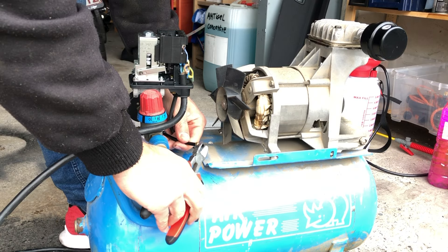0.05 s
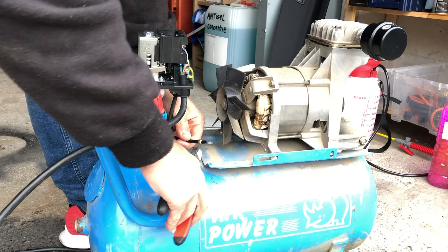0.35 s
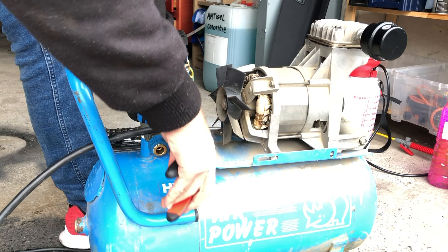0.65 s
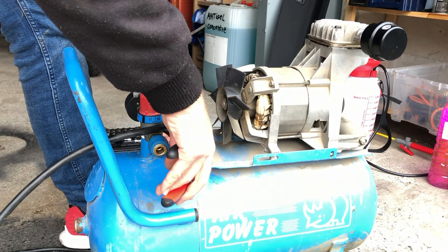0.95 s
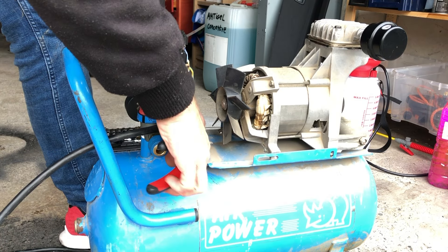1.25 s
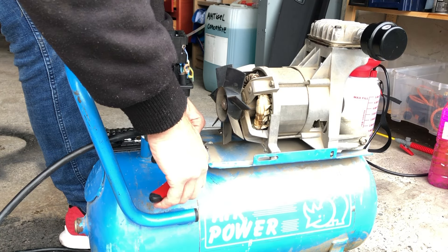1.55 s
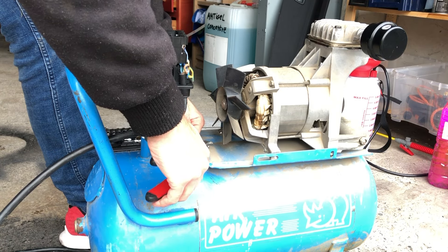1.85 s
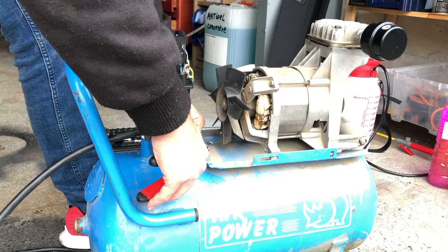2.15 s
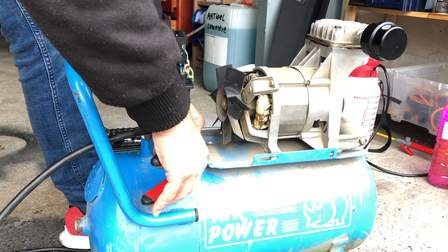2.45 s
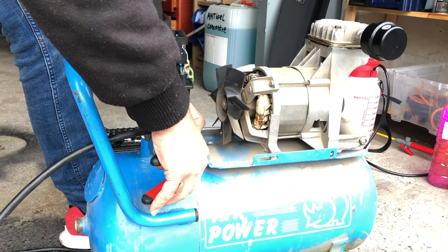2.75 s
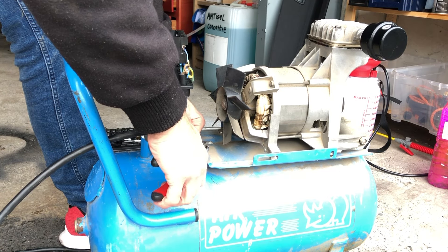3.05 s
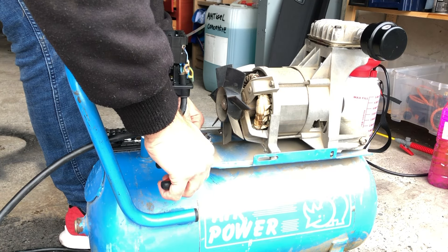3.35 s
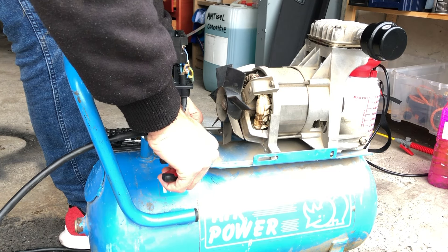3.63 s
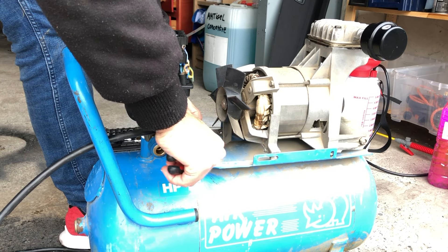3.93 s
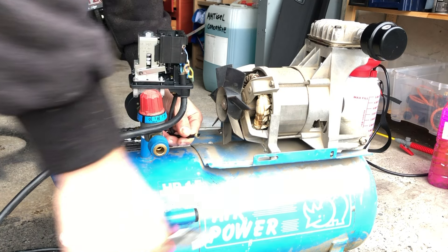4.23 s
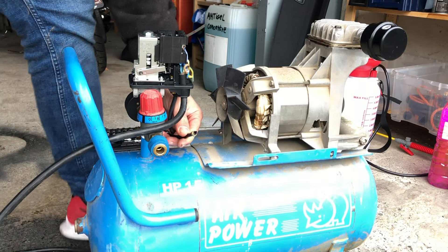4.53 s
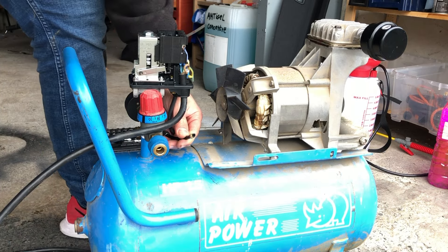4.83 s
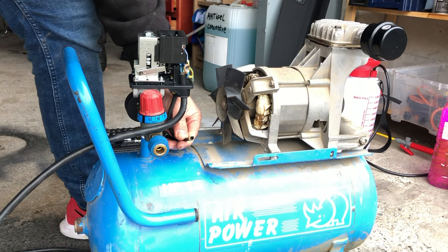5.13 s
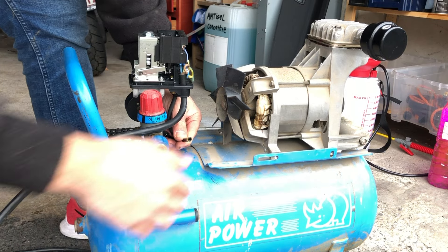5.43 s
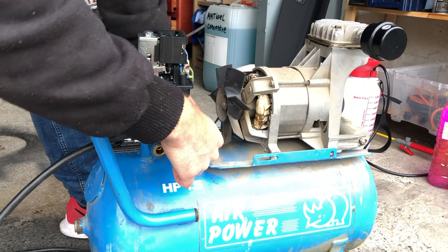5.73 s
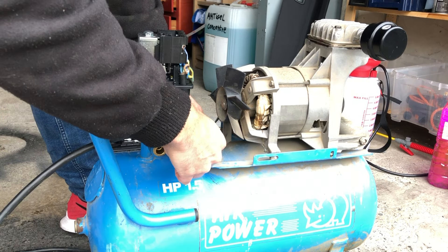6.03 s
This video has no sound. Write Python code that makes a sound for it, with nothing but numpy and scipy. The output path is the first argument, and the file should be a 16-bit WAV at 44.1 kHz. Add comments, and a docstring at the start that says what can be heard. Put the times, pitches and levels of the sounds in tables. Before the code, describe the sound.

Compressed air hisses steadily from a leaking fitting on a small workshop compressor, its tone shifting as a hand works around it. About halfway through, the leak is pinched off for half a second. It breaks out again with a pop that rings the steel tank, hisses a little louder and spits a few times. Light knocks and faint room rumble lie underneath, all heard through one microphone.

```python
"""A steady hiss comes first: compressed air leaking from a fitting on a small workshop compressor.
It rings in the short pipe behind the gap and takes its colour from the hand working around it.
The leak is pinched off for half a second, breaks out again with a pop that rings the tank, and spits
a few times. Light knocks, room rumble and a far, low hum lie underneath.
One microphone, the same on both channels."""
import sys
import numpy as np
from scipy import signal
from scipy.fft import rfft, irfft
from scipy.io import wavfile
from scipy.ndimage import map_coordinates

SR = 44100
rng = np.random.default_rng(int(sys.argv[2]) if len(sys.argv) > 2 else 0)


def wrap_up_sound(samples):
    """Save the sound to the file named by the first command line argument, as 16-bit audio."""
    columns = np.atleast_2d(samples).T
    # keep every value between -1 and 1, then stretch to whole-number steps
    tamed = np.clip(columns, -1, 1)
    steps = np.round(tamed * 32767).astype(np.int16)
    wavfile.write(sys.argv[1], SR, steps)


N = 277036
TIME = np.arange(N) / SR
HZ = np.maximum(np.fft.rfftfreq(N, 1 / SR), 1)

# The jet's strength before and after the pinch. Each row: time in seconds, level in dB.
LEAK_BEFORE = [(0.03, -33.5), (0.26, -34), (0.78, -38), (0.87, -34.5), (1.34, -32), (1.74, -33),
               (1.9, -31.5), (2.45, -33), (3.28, -33), (3.34, -30), (3.39, -38), (3.42, -49)]
LEAK_AFTER = [(3.94, -25), (4.01, -29), (4.06, -33), (4.27, -29), (5.14, -28.5), (5.45, -29.5), (5.55, -32),
              (5.66, -31), (5.76, -26.5), (6.22, -25), (6.27, -29.5)]
# Two spells of hiss, running past both ends of the scene. Each row: strength curve, opening and shutting
# in seconds, share of the swing that the low body follows, delay of the tank's reflection in seconds.
HISS_SPELLS = [(LEAK_BEFORE, -1, 3.42, 0.084, .00133), (LEAK_AFTER, 3.921, 7, 0.78, .0014)]
# Turbulence of the free jet. Each row: frequency in Hz, relative level in dB.
JET_SPECTRUM = [(60, -21.5), (200, -15), (420, -10), (750, -2), (1100, 1), (2200, 1), (4000, 3),
                (8000, 1.5), (12000, -3), (15500, -5)]
# Resonances and shadows of hand and gap, a table a grip. Each row: centre in Hz, width in Hz, gain in dB.
REACHING = [(1310, 160, -9), (1630, 300, 2.5), (2030, 430, -4), (2950, 110, 5), (3510, 380, 6),
            (4340, 300, 9.5), (4970, 2700, -5.5), (6340, 300, 6.5), (7200, 260, 6), (8100, 220, 2.5),
            (8500, 240, -7), (10200, 370, -2), (11680, 240, 4), (12900, 340, -4), (14200, 280, 4)]
TURNING = [(1330, 110, -10), (1780, 250, 5), (2310, 710, -5), (3940, 380, -8), (4510, 300, 6.5),
           (5430, 480, 8.5), (6000, 1430, -8), (8200, 190, 2), (9260, 260, 4), (9750, 200, 3),
           (12660, 330, -9), (15250, 260, -11)]
CUPPED = [(788, 57, -7.5), (1290, 190, -9.5), (1810, 340, 0.5), (2230, 490, -3), (2715, 92, -15),
          (3920, 670, -7), (4330, 460, 6.5), (4800, 220, -3), (6180, 780, -6.5), (7370, 120, -6),
          (8560, 200, -3), (9090, 380, 5.5), (12250, 620, -6), (13700, 400, -1), (15200, 1800, -4.5)]
PINCHED = [(820, 200, -6.4), (1440, 6200, -10), (8660, 540, -4.8), (13800, 240, -9), (13500, 770, 8),
           (14510, 190, 3)]
LOOSE = [(596, 230, 0.5), (1920, 150, -9.5), (2970, 220, 7.5), (4120, 890, 6), (8900, 190, -5.1),
         (10000, 210, 9), (11600, 310, -6), (12040, 360, 11.5), (14600, 270, 14)]
OPEN = [(680, 230, -3), (1650, 1170, -5), (1850, 160, -6.5), (2840, 290, 4), (4630, 290, -4.5),
        (5240, 210, -11), (5900, 260, -4.5), (6530, 460, 6), (7910, 440, -13.5), (8180, 200, 8),
        (8500, 220, -4), (9080, 250, 3), (9500, 240, -2), (11040, 700, -3.5), (14500, 280, 2.5)]
COVERED = [(1300, 990, -6.5), (2200, 150, 3.5), (2980, 190, 2.5), (3800, 220, -7), (7080, 1370, 5.5),
           (8300, 220, 6), (9200, 300, -4.5), (9900, 220, 6), (13400, 800, 1)]
# Grips by name. Each entry: resonances, share of the wave that the pipe's end sends back.
GRIPS = {"reaching": (REACHING, 0.34), "turning": (TURNING, 0.35), "cupped": (CUPPED, 0.48),
         "pinched": (PINCHED, 0.11), "loose": (LOOSE, 0.28), "open": (OPEN, 0.28),
         "covered": (COVERED, 0.22)}
# The hand glides into a new grip. Each row: start in seconds, glide in seconds, grip.
GRIP_CHANGES = [(.42, 0.37, "turning"), (1.22, .11, "cupped"), (3.1, 0.13, "reaching"),
                (3.24, 0.075, "pinched"), (3.93, 0.04, "covered"), (3.98, 0.048, "loose"),
                (4.16, 0.11, "open"), (5.47, .08, "loose"), (5.63, 0.17, "covered")]
FIRST_GRIP = "reaching"
# Hand or sleeve passes the jet. Each row: closest moment in seconds, half length in seconds,
# delay of the reflection when closest in seconds, share reflected.
ARM_PASSES = [(1.232, 0.5, 0.000202, 0.074), (4.15, 0.13, 0.000135, 0.14), (6.09, 0.5, 0.000423, 0.092),
              (6.07, .55, .00081, 0.14), (6.14, 0.35, 0.000107, 0.069)]
# Pops and spits at the gap. Each row: start in seconds, level in dB, pitch in Hz, overtone spacing in Hz,
# first overtone's loss in dB, swell in seconds, ratio of crack to tone.
GAP_POPS = [(3.9135, -12, 1945, 1890, 0.7, 0.0016, 0.53), (3.9185, -21.5, 875, 600, 10, 0.0013, .5),
            (4.012, -23.5, 3400, 1400, 2, 0.0031, 1.3), (4.933, -5.5, 1110, 1730, 6.5, .0016, .14),
            (4.931, -18.5, 2090, 1300, 5, .0012, .15), (4.96, -23, 1150, 900, 15, 0.0013, .12),
            (5.023, -21, 6160, 2300, 8, .002, .15), (5.0558, -13, 1200, 750, 1.5, 0.0012, 0.1),
            (5.0617, -12.5, 5900, 2400, 5, 0.0013, .11), (5.0703, -10.5, 1330, 750, 24, 0.00053, 0.13),
            (5.0924, -16.5, 1220, 750, 9, 0.0014, 0.31), (5.108, -15.5, 3530, 1050, -0.5, 0.00097, .25),
            (5.1103, -21, 4630, 1900, 10, 0.002, 1.5)]
# Blows on the steel tank. Each row: start in seconds, level in dB.
TANK_KNOCKS = [(.229, -42), (1.459, -40.5), (2.479, -36), (3.219, -50), (3.919, -28.5)]
# The tank's modes. Each row: frequency in Hz, relative level in dB, seconds to fall by 60 dB.
TANK_MODES = [(226, -19, 0.21), (415, -15, 0.13), (729, 1, 0.13), (1230, -13, .08), (2050, -2.5, 0.047),
              (3774, -5, .06), (6530, -1, .06)]
# Low, dull thuds. Each row: start in seconds, level in dB, pitch in Hz, swell in seconds.
LOW_THUDS = [(3.494, -48, 110, 0.009), (3.57, -51, 70, 0.0096), (3.916, -33, 225, 0.0057),
             (3.921, -44, 61, .012), (4.275, -38.5, 62, .01), (4.655, -38, 270, 0.0056),
             (4.933, -27, 540, .0031), (5.148, -45, 281, .009), (6.206, -37, 75, 0.012),
             (6.25, -40, 80, .01)]
# Ticks of the fitting while it is held shut. Each row: start in seconds, level in dB, pitch in Hz.
FITTING_TICKS = [(3.647, -43, 3860), (3.861, -54, 6000), (3.874, -48, 4500)]
# The sleeve brushes along. Each row: middle in seconds, half length in seconds, level in dB.
SLEEVE_STROKES = [(4.616, 0.12, -47.5), (5.08, 0.2, -51), (5.628, 0.15, -49.5)]
# Rubbing cloth. Each row: frequency in Hz, relative level in dB.
CLOTH_SPECTRUM = [(40, -18), (110, -8), (250, -3.5), (480, -0.5), (900, -3), (3000, -30)]
# The workshop's room tone. Each row: frequency in Hz, relative level in dB.
ROOM_SPECTRUM = [(25, -24), (40, -7), (60, -5.5), (100, -3), (160, -5.5), (220, -12), (330, -15),
                 (700, -16), (1800, -21.5), (3500, -25.5), (15000, -41.5)]
# A far, low hum. Each row: time in seconds, level in dB.
HUM_LEVELS = [(0.0, -72), (1.71, -58), (3.25, -67), (3.99, -56), (4.01, -61), (6.1, -65), (6.15, -61)]


def leak(flutter_db, tank_share, body_hz, body_db, surge_db, surge_s):
    """At the fitting: jet noise coloured by pipe and hand, rippled by a reflection off the tank."""
    hiss, out = np.zeros(N), np.zeros(N)
    for name, (resonances, reflection) in GRIPS.items():
        colour = from_db(spectrum_db(JET_SPECTRUM) + hand_db(resonances)) * pipe(reflection)
        hiss += np.sqrt(grip_share(name)) * noise(colour, above_hz=4000)
    hiss *= from_db(flutter_db * drift(rate_hz=36))
    # Long waves bend round the hand, so the body swells and fades less than the treble.
    body = irfft(rfft(hiss) / (1 + (HZ / body_hz) ** 4), N)
    for strength, opens, shuts, follows, echo_s in HISS_SPELLS:
        db = in_time(strength)
        blowing = (TIME > opens) & (TIME < shuts)
        fullness_db = body_db + np.minimum((1 - follows) * (np.median(db[blowing]) - db), 5.5)
        surge = surge_db * np.exp(-np.abs(TIME - opens) / surge_s)  # pent-up air escapes on opening
        jet = blowing * from_db(db + surge) * (hiss + (from_db(fullness_db) - 1) * body)
        out += jet + tank_share * delayed(jet, echo_s)
    return out


def pipe(reflection, spacing_hz=897, treble_loss_hz=60000):
    """Waves run up and down the pipe, losing treble on each round: evenly spaced resonances."""
    round_trip = reflection * np.exp(-HZ / treble_loss_hz - 2j * np.pi * HZ / spacing_hz)
    return 1 / np.abs(1 - round_trip)


def hand_db(resonances):
    """Humps and hollows that the hand puts on the hiss."""
    return sum(db * np.exp(-.5 * (2 * (HZ - hz) / width) ** 2) for hz, width, db in resonances)


def grip_share(name):
    """How far the hand is in one grip, 0 to 1: each new grip takes over from the one before."""
    held = np.full(N, float(name == FIRST_GRIP))
    for start, glide, grip in GRIP_CHANGES:
        held += np.clip((TIME - start) / glide, 0, 1) * ((grip == name) - held)
    return np.clip(held, 0, 1)


def passing_arm(hiss, detour_growth):
    """The arm throws hiss to the microphone over a detour that shrinks and grows: moving ripples."""
    out = hiss.copy()
    for closest, half_length, nearest_delay, share in ARM_PASSES:
        away = np.minimum(((TIME - closest) / half_length) ** 2, 2)
        delay = nearest_delay * (1 + detour_growth * away)
        reflections = delayed(hiss, delay) + .8 * delayed(hiss, 2.3 * delay)
        out += share * np.exp(-away ** 2) * reflections
    return out


def pops(sag_hz, crack_hz):
    """Air and droplets break through the gap in bursts of milliseconds, each with two overtones."""
    out = np.zeros(N)
    for start, db, pitch, spacing, loss_db, swell, crack in GAP_POPS:
        for k in range(3):
            hz = pitch + k * spacing
            partial_swell = swell * (pitch / hz) ** .35  # higher partials die sooner
            partial = burst(hz, partial_swell, crack, sag_hz, crack_hz)
            add(out, start, from_db(db - loss_db * k ** 2) * partial)
    return out


def burst(hz, swell_s, crack, sag_hz, crack_hz):
    """A heavily damped ring that swells and dies with a crack of noise; sag_hz makes its pitch sink."""
    age = TIME[:int(10 * swell_s * SR)] / swell_s
    pitch = hz + sag_hz * (np.exp(-age) - np.exp(-1))
    tone = np.sin(2 * np.pi * np.cumsum(pitch) / SR)
    band = signal.butter(1, [hz / 3, crack_hz], "band", fs=SR, output="sos")
    grit = signal.sosfilt(band, rng.standard_normal(len(age)))
    envelope = (age * np.exp(1 - age)) ** 2
    return envelope * (tone + crack * grit / grit.std()) / np.sqrt(1 + crack ** 2)


def tank():
    """Each blow rings the steel tank's modes with strengths of its own."""
    out, t = np.zeros(N), TIME[:SR // 2]
    for start, blow_db in TANK_KNOCKS:
        for hz, db, t60 in TANK_MODES:
            ring = np.sin(2 * np.pi * hz * t) * np.exp(-np.log(1000) * t / t60)
            add(out, start, from_db(blow_db + db + rng.normal(0, 2.2)) * ring)
    return out


def thuds(sag_hz, roughness):
    """Low, dull thuds: soft bumps and the thump under the loud pops."""
    out = np.zeros(N)
    for start, db, hz, swell in LOW_THUDS:
        add(out, start, from_db(db) * burst(hz, swell, roughness, sag_hz, crack_hz=hz))
    return out


def ticks(swell_s, crack, crack_hz):
    """The fitting gives small dry ticks under the fingers."""
    out = np.zeros(N)
    for start, db, hz in FITTING_TICKS:
        add(out, start, from_db(db) * burst(hz, swell_s, crack, sag_hz=0, crack_hz=crack_hz))
    return out


def sleeve(gain_db, grain_db):
    """Cloth rubs in soft, uneven strokes that swell and fade."""
    strokes = sum(from_db(db) * np.exp(-((TIME - middle) / half_length) ** 2)
                  for middle, half_length, db in SLEEVE_STROKES)
    grain = from_db(gain_db + grain_db * drift(rate_hz=25))
    return strokes * grain * noise(from_db(spectrum_db(CLOTH_SPECTRUM)))


def seep(hz, width_hz, level_db):
    """A trace of air gets through the gap even when it is shut: a faint, thin, constant whistle."""
    return from_db(level_db) * noise(1 / (1 + (2 * (HZ - hz) / width_hz) ** 2))


def workshop(sound, wet_db, t60, first_s):
    """Dense reflections off floor and clutter follow the direct sound and die away quickly."""
    t = TIME[:SR // 2]
    tail = rng.standard_normal(len(t)) * np.exp(-np.log(1000) * t / t60) * (t > first_s)
    tail *= from_db(wet_db) / np.linalg.norm(tail)
    return sound + signal.fftconvolve(sound, tail)[:N]


def room_tone(rumble_db, hum_hz):
    """The room's low rumble and, far from the microphone, a wavering hum."""
    rumble = noise(from_db(spectrum_db(ROOM_SPECTRUM)), above_hz=150)
    hum = np.sqrt(2) * np.sin(2 * np.pi * hum_hz * TIME + 1.65 * drift(rate_hz=1.8))
    return from_db(rumble_db) * rumble + from_db(in_time(HUM_LEVELS)) * hum


def from_db(db):
    """Decibels to gain."""
    return 10 ** (np.asarray(db) / 20)


def in_time(rows):
    """Points in time joined by straight lines."""
    return np.interp(TIME, *np.transpose(rows))


def spectrum_db(points):
    """Points of a spectrum joined along a log frequency axis."""
    hz, db = np.transpose(points)
    return np.interp(np.log(HZ), np.log(hz), db)


def noise(gain, above_hz=0):
    """Coloured noise, scaled so that its part over above_hz has rms 1."""
    coloured = irfft(rfft(rng.standard_normal(N)) * gain, N)
    return coloured / np.sqrt(np.mean(gain ** 2 * (HZ > above_hz)))


def drift(rate_hz):
    """A slow random wander with spread 1."""
    return noise(1 / (1 + (HZ / rate_hz) ** 2))


def delayed(sound, delay_s):
    """The sound after a detour of steady or changing length."""
    return map_coordinates(sound, [(TIME - delay_s) * SR], order=3)


def add(out, start_s, sound):
    """Mix a short sound in at start_s."""
    start = int(start_s * SR)
    out[start:start + len(sound)] += sound[:N - start]


def scene():
    """At the microphone: all sources share one workshop and reach both channels alike."""
    jet = leak(flutter_db=.5, tank_share=.14, body_hz=2640, body_db=.2, surge_db=2.5, surge_s=.015)
    jet = passing_arm(jet, detour_growth=.36)
    mono = workshop(jet, wet_db=-8.5, t60=.15, first_s=.003)
    mono += seep(hz=3430, width_hz=84, level_db=-73.5)
    contacts = pops(sag_hz=500, crack_hz=7900) + ticks(swell_s=.00051, crack=1.6, crack_hz=7000)
    contacts += tank() + thuds(sag_hz=15, roughness=.36) + sleeve(gain_db=-.5, grain_db=3.5)
    mono += workshop(contacts, wet_db=-9.5, t60=.24, first_s=.0037)
    mono += room_tone(rumble_db=-58, hum_hz=64)
    return np.array([mono, mono])


def record(dry):
    """The microphone sheds the deepest bass; the top is cut steeply."""
    low_cut = signal.butter(2, 38, "high", fs=SR, output="sos")
    high_cut = signal.ellip(12, .1, 80, 15800, fs=SR, output="sos")
    return signal.sosfilt(high_cut, signal.sosfilt(low_cut, dry))


dry = scene()
out = record(dry)
wrap_up_sound(out)
```